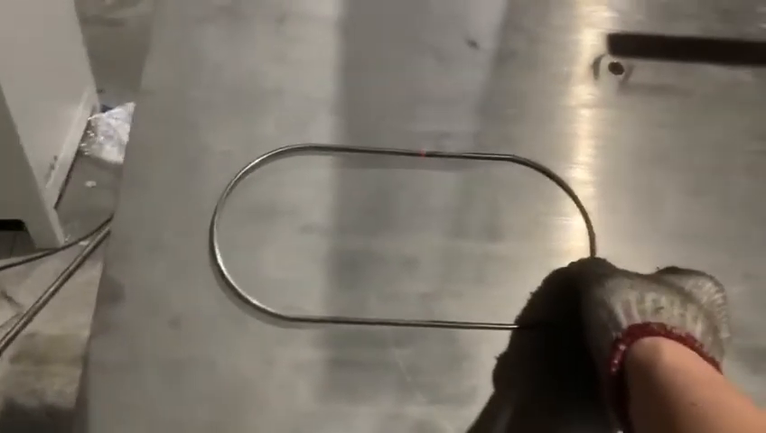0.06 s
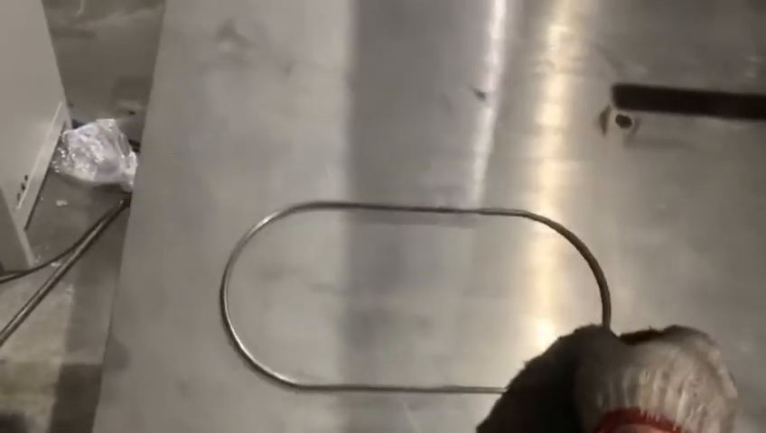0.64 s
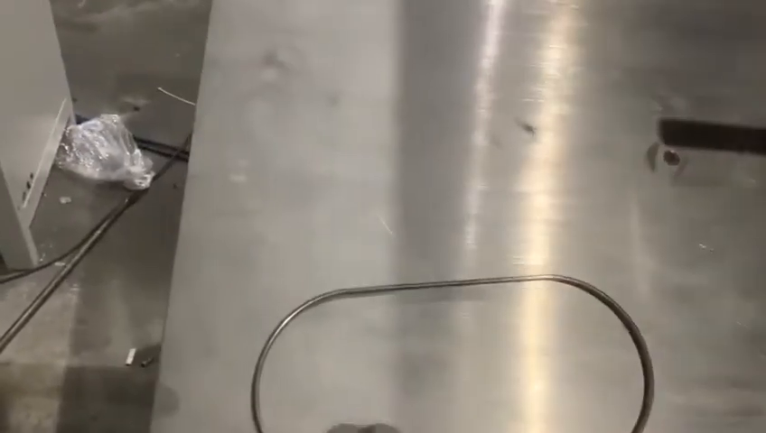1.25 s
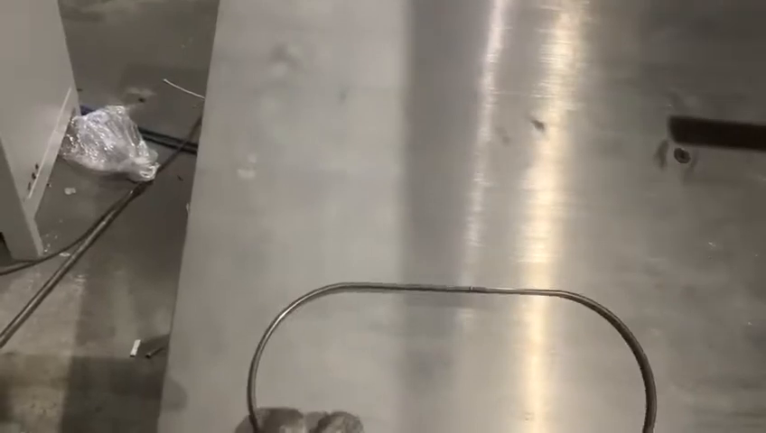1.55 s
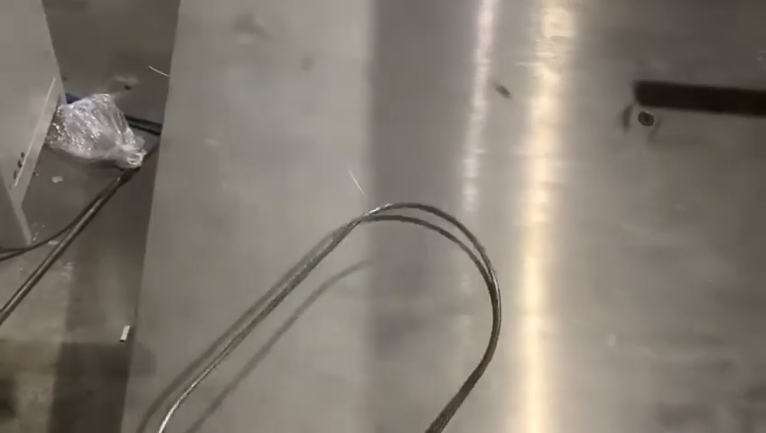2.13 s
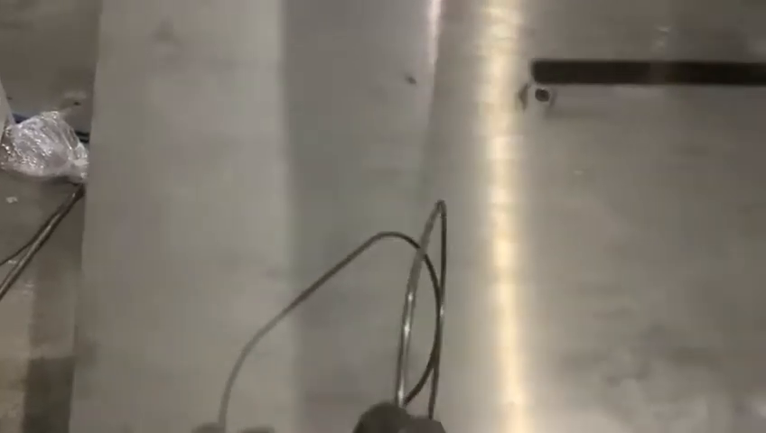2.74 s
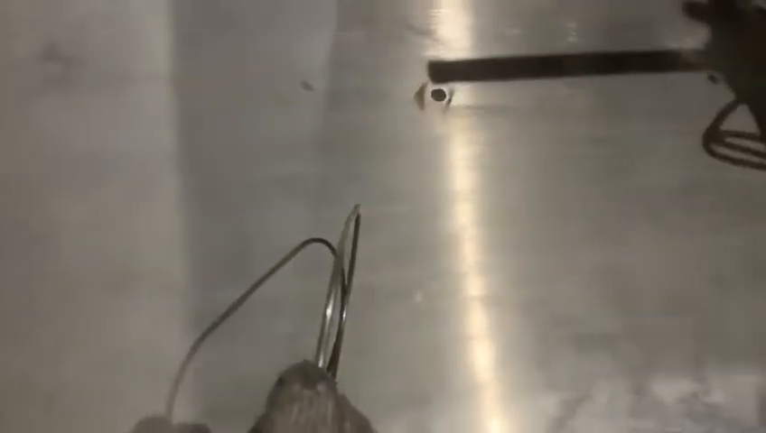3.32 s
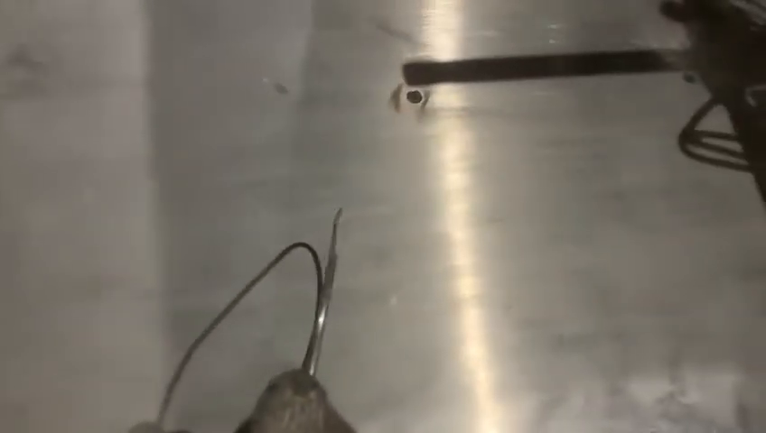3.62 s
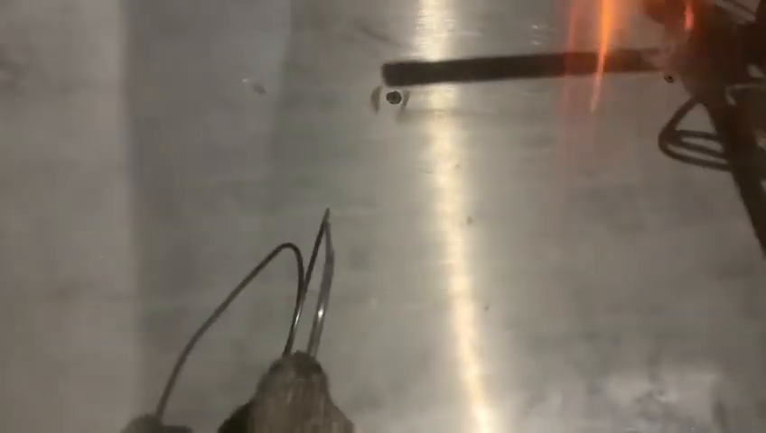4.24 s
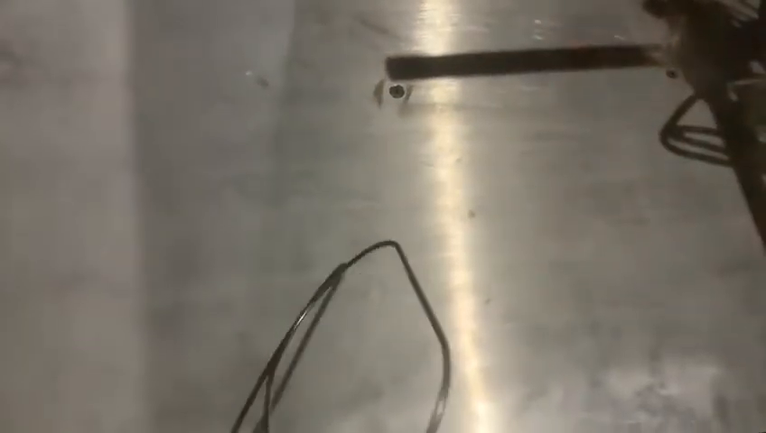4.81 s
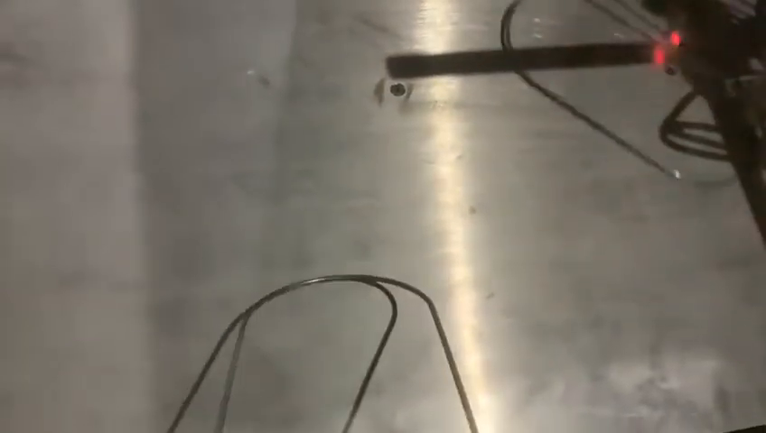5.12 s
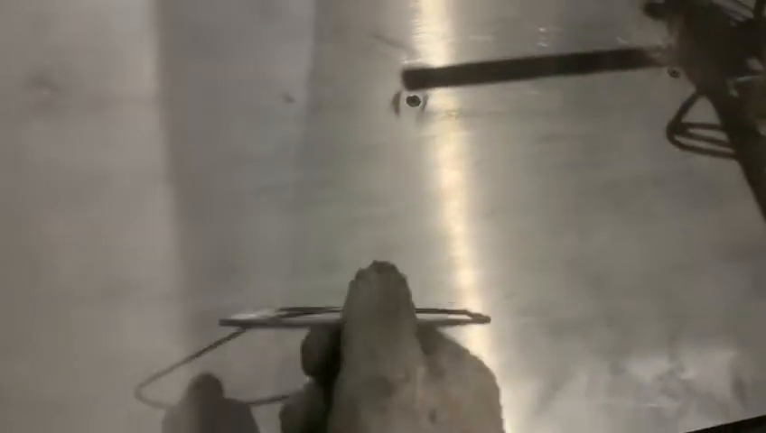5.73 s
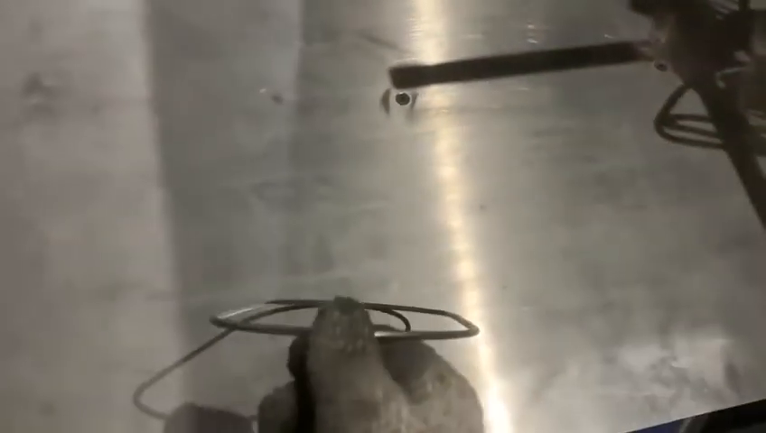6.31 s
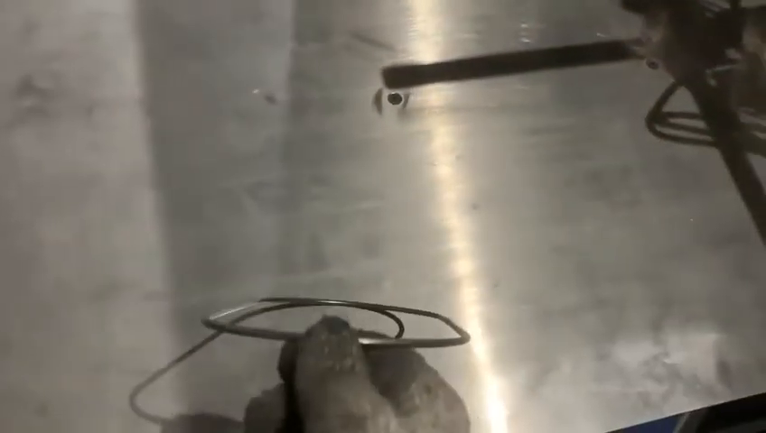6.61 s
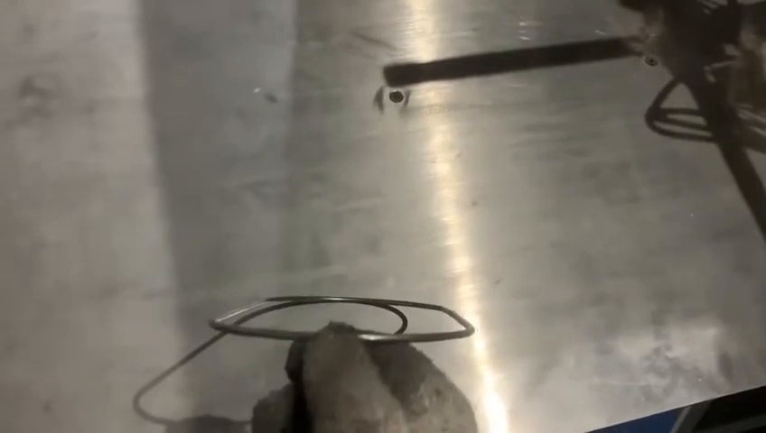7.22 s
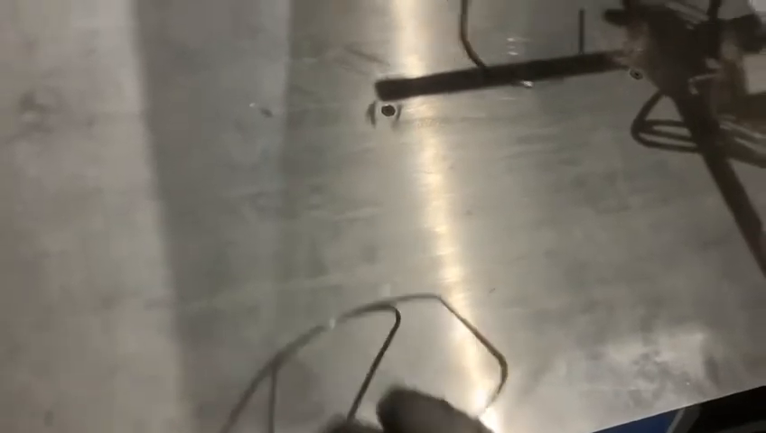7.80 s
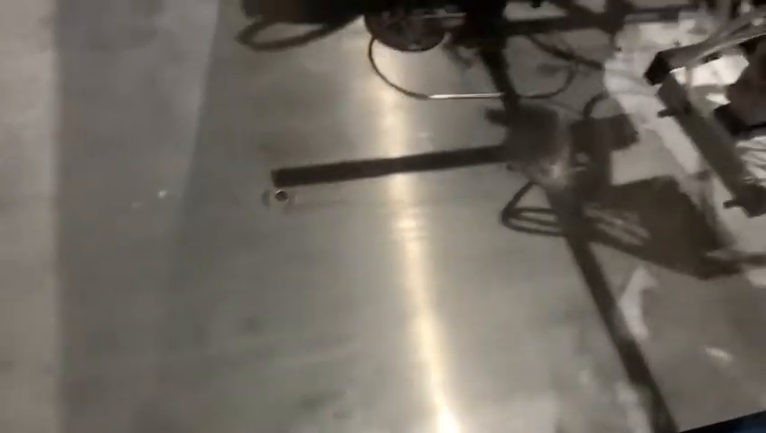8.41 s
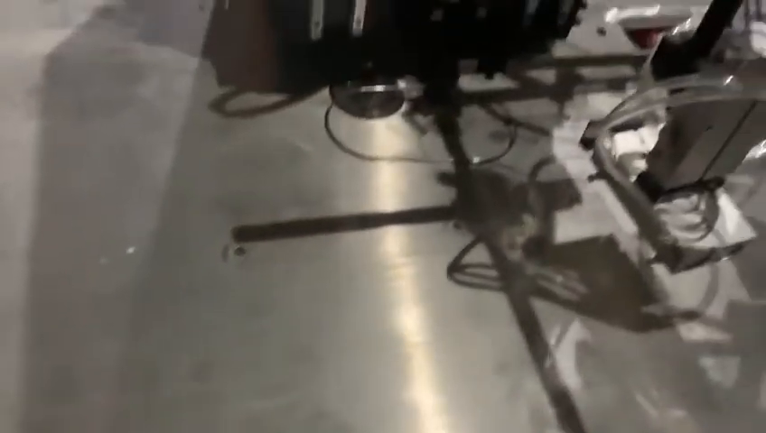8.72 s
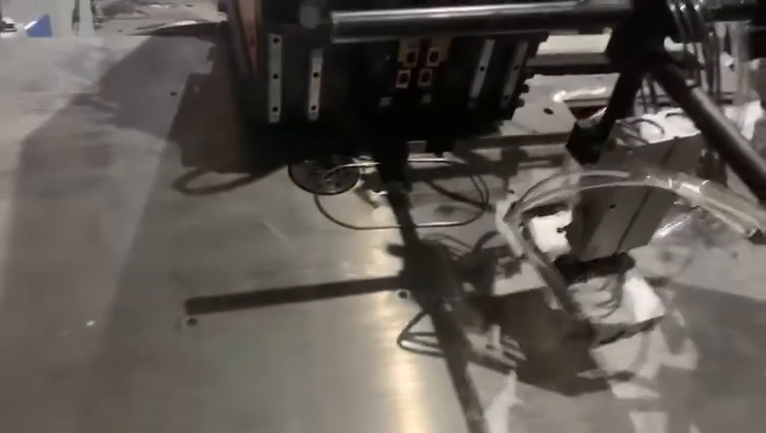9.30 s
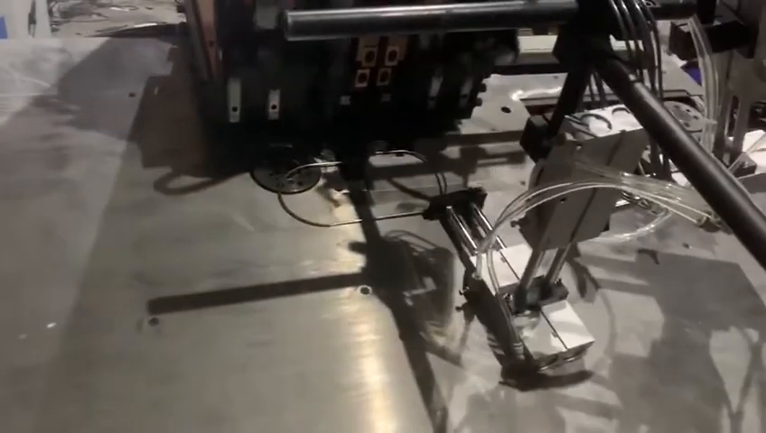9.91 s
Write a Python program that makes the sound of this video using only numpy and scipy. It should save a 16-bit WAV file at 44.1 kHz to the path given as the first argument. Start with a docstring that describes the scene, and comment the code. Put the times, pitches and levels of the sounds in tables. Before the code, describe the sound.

A puff of air and a hollow knock start the cycle of a wire bending and welding machine, heard close by. Cylinders hiss and squeak while slides rumble and clack against their stops over a low drone. Midway the welder hums briefly, then steel hoops clatter loudly and ring. After a quieter stretch, more clinks, clacks and hissing follow. Fans run steadily in the echoing factory hall.

```python
"""A puff of air and a hollow knock open the cycle of a wire bending and welding machine, heard close by.
Cylinders vent and hiss, slides rumble and clack against their stops, and the welder hums once.
Bent steel hoops clink on the tooling and bounce on a sheet steel table; each blow rings their modes.
Underneath, the frame drones, a servo whines and fans run in the echoing factory hall."""
import sys
import numpy as np
from scipy import signal
from scipy.fft import rfft, irfft, next_fast_len
from scipy.io import wavfile
from scipy.ndimage import uniform_filter1d

SR = 44100
rng = np.random.default_rng(int(sys.argv[2]) if len(sys.argv) > 2 else 0)


def generate_wav(sig):
    """Save sig (samples, or channels by samples) to the path in sys.argv[1] as 16-bit PCM at SR."""
    pcm = np.round(np.clip(np.atleast_2d(sig).T, -1, 1) * 32767).astype(np.int16)
    wavfile.write(sys.argv[1], SR, pcm)


N = 438794
TIME_S = np.arange(N) / SR

# Hoop on grippers or table, taps on a small guide, free wire struck at the bending head.
# Each row: start in seconds, relative level in dB, clash t60 in seconds, free ring in dB.
HOOP_BLOWS = [(0.2659, -27, 0.16, -4), (0.2937, -29.5, 0.1, -11), (0.3292, -28, 0.095, -4),
              (0.3502, -28.5, 0.12, -12), (1.809, -19.5, 0.1, -15), (2.5391, -30, 0.063, -12),
              (2.6472, -27.5, 0.059, 5), (4.5352, -25.5, 0.06, -8), (4.6759, -8, 0.084, -14),
              (4.8025, -30, 0.075, 2), (4.8585, -28.5, 0.09, 1), (4.9398, -10, .09, -12.5),
              (5.0085, -11, 0.06, -15.5), (5.0674, -20.5, 0.18, -7), (5.1113, -16.5, 0.17, -13),
              (5.1826, -28, 0.21, -6), (5.224, -18, 0.19, -7), (5.2737, -27.5, 0.14, -20),
              (5.3294, -30, 0.11, -15), (5.5308, -38.5, 0.11, -28), (6.2645, -30.5, 0.072, 7),
              (6.303, -35, 0.19, 3), (6.4128, -36, 0.091, 7), (8.2234, -24, 0.044, -17),
              (8.489, -20, 0.14, -15), (8.7246, -19, 0.084, 5), (8.7575, -19.5, .09, 4.5),
              (8.8952, -22.5, 0.087, -2)]
GUIDE_BLOWS = [(9.1306, -21, 0.087, 1), (9.1446, -21.5, 0.092, 1), (9.2938, -25, 0.023, 0),
               (9.3114, -34, 0.046, 1)]
WIRE_BLOWS = [(9.4796, -19.5, .08, -0.5), (9.7019, -22, 0.51, -1.5), (9.819, -27.5, 0.18, -2)]
# Modes of the steel parts. Each row: frequency in Hz, relative level in dB, t60 in seconds.
HOOP_MODES = [(2650, -24, 1), (6200, -3.5, 0.26), (7300, -6, 0.32), (7800, -10.5, 0.59), (9300, 6.5, 0.14),
              (9350, -12, 0.2), (10620, -1.5, 0.69), (10500, 2, 0.43), (11369, -23, .2), (11940, -6, 0.39),
              (12080, 4.5, 0.31), (12600, -13.5, .3), (13230, -19, .3), (13300, 9, 0.41), (14300, 14, 0.66)]
GUIDE_MODES = [(5900, -19, 0.97), (6550, -20, .6), (8260, -12, 0.98), (9237, -7, 0.51), (9800, -12, .3),
               (10400, -7.5, 0.86), (10860, -5, 0.65), (11600, -3, 0.65), (13113, 0, 0.6), (13500, -8, .35),
               (13800, 5, 0.46), (14200, -8, 0.41)]
WIRE_MODES = [(4650, -20, .3), (5050, -8, 0.27), (5470, -11, 0.37), (5600, -10, 0.33), (6200, -4, 0.53),
              (6370, -5, 0.57), (6670, -5, 0.39), (7320, -2, 0.48), (8000, -4, .3), (7840, -10, 1),
              (8204, -6, 0.56), (8800, -2, 0.39), (9100, -13, 0.56), (9850, -4, 0.33), (10400, -1.5, 0.55),
              (11050, -7, .4), (12100, -9, 0.41), (12300, -1.5, 0.37), (13350, -1, .4), (13990, 0.5, 0.3)]
FRAME_MODES = [(131.5, -11.5, 0.94), (163.1, 1, 0.45), (214, -11.5, 0.56), (312.7, -3.5, 0.76),
               (356, 1, 0.3)]
# Clamps, cutter and end stops. Each row: start in seconds, relative level in dB,
# hardness (treble boost) in dB, heft (bass boost) in dB, base t60 in seconds.
CLACK_BLOWS = [(0.175, -34, -6, -5, 0.11), (1.04, -21, 8, -7, .12), (1.557, -24, 0, -2, 0.23),
               (1.57, -24, 6.5, -0.5, 0.12), (1.6, -22, 4.5, -9, .13), (2.026, -21, 5.5, -11, 0.075),
               (2.647, -25, 0.5, -14, 0.22), (2.694, -28.5, 2.5, -17, 0.087), (2.889, -23, 10, -6, 0.11),
               (2.926, -23.5, -5, 0.5, 0.11), (3.438, -29, 9, 1, 0.066), (3.522, -32.5, -9, -2, 0.13),
               (3.819, -38.5, -28, 0.5, 0.17), (4.008, -33.5, -20, -2.5, 0.085),
               (4.674, -38, 20, -7, 0.077), (4.698, -31.5, 13, -8, 0.2), (4.833, -35.5, -1, 6, 0.13),
               (5.807, -33, -0.5, -11, 0.12), (5.834, -37, -6, -15, 0.15), (6.558, -44.5, -1, -8, 0.1),
               (7.57, -39.5, -3, -23, 0.38), (7.599, -38.5, -6, -6.5, 0.1), (8.12, -42, 11, -8, .21),
               (8.469, -44, 15.5, -12, .17), (8.488, -38, 22.5, -14, 0.31), (8.836, -40.5, 20, -7, 0.23),
               (9.595, -19, 4.5, -14, 0.087)]
# Centres in Hz of a clack's thud, body, clatter and crack.
BAND_CENTRES_HZ = [130, 600, 2800, 8000]
# Housing knocks. Each row: start in seconds, relative level in dB, base t60 in seconds.
HOUSING_BLOWS = [(0.0, -31.5, 0.28), (0.18, -28.5, 0.15), (1.56, -36, 0.35), (4.584, -29, 0.32),
                 (4.677, -22.5, 0.2), (5.281, -32, 0.62), (8.113, -33, 0.12), (8.477, -26.5, 0.21),
                 (9.6, -38, 0.24)]
# Housing modes. Each row: frequency in Hz, relative level in dB, share of the knock's t60.
HOUSING_MODES = [(365.8, -1.5, 0.72), (393.7, -5.5, 1), (522, -9, 1), (669, -1, 0.22)]
# Slide moves. Each row: start, run-up and braking in seconds, relative level at top speed in dB.
SLIDE_MOVES = [(0.185, 0.017, 0.26, -27), (0.43, 0.022, 0.092, -31.5), (1.62, 0.032, 0.24, -29),
               (1.8, .02, 0.19, -32), (2.55, 0.089, 0.23, -26.5), (2.94, 0.017, 0.3, -27.5),
               (3.2, 0.099, 0.13, -25.5), (3.44, 0.026, 0.16, -33), (4.44, 0.022, 0.21, -31),
               (4.59, 0.09, 0.075, -29.5), (4.851, 0.064, 0.37, -21.5), (5.24, 0.048, 0.31, -34.5),
               (6.842, 0.098, 0.16, -24.5), (8.748, 0.0061, 0.29, -29)]
# Cylinder exhausts. Each row: start and length in seconds, relative level in dB.
EXHAUSTS = [(0.0, 0.044, -26.5), (0.049, 0.53, -39), (0.585, 0.61, -35), (1.173, 0.98, -40),
            (2.2, 0.44, -34), (2.59, 0.346, -39), (2.937, .12, -29), (3.208, 0.087, -25.5),
            (3.3, 0.18, -39), (3.509, 0.045, -33), (4.271, 0.039, -31), (4.414, 0.12, -26),
            (4.536, .12, -45), (5.297, 0.3, -34), (6.722, 0.05, -38.5), (6.833, 0.16, -46),
            (7, 0.084, -36.5), (8.526, 0.22, -40), (8.823, .19, -35), (9.141, 0.54, -35),
            (9.617, 0.31, -37.5)]
# Exhaust port resonances. Each row: frequency and width in Hz, relative level in dB.
PORT_MODES = [(2370, 49, -26.5), (2877, 780, -16.5), (3443, 310, -16.5), (3860, 330, -19.5),
              (5400, 580, -19.5), (6660, 73, -20.5)]
# Valve squeals. Each row: start and length in seconds, first and last pitch in Hz, level in dB.
VALVE_SQUEALS = [(2.182, 0.12, 6020, 4160, -50), (2.593, 0.03, 5300, 4790, -31),
                 (3.21, 0.057, 5160, 4490, -34.5), (3.254, 0.058, 4420, 3580, -33),
                 (4.418, 0.062, 5160, 3800, -30.5), (4.421, 0.04, 3700, 3010, -35),
                 (4.51, 0.028, 6670, 6100, -34.5), (4.61, 0.048, 2550, 1990, -44),
                 (6.74, 0.038, 4700, 4600, -52)]
# Wire feed hiss, weld current, drive drone, frame boom after heavy strokes, servo turns.
# Each row: start and length in seconds, relative level in dB, fade in dB per second (negative swells).
FEED_RUNS = [(7.804, .45, -50, -28.5)]
WELD_RUNS = [(4.0, .55, -31.5, 23)]
DRONE_RUNS = [(1.6, .36, -43, 5), (2.2, 0.23, -38, 15), (2.87, 0.81, -27, 16), (3.7, 0.29, -44, -2),
              (4.04, 1.68, -32.5, 5.5)]
BOOM_RUNS = [(1.62, 0.34, -34, 0), (2.2, 0.158, -41, 27)]
SERVO_RUNS = [(2.2, 0.42, -60, 7), (5.55, 0.35, -63.5, 4), (6.75, 0.2, -46, 0), (7.35, 0.43, -52.5, 9),
              (9.15, 0.15, -58.5, 3)]
# Fan tones. Each row: frequency and width in Hz, level in dB.
FAN_TONES = [(525, 20, -61.5), (364, 21, -63), (64.7, 7.8, -66)]
# Noise spectra of the sources. Each row: frequency in Hz, relative density in dB.
CLASH_SPECTRUM = [(150, -25), (800, -6.5), (2000, -15), (4000, -6), (6000, -3), (8000, -4), (11000, -3),
                  (14000, -7)]
CLACK_SPECTRUM = [(29, -45), (50, -24), (141, -0.5), (254, -8), (380, 1.5), (528, -9.5), (718, -6),
                  (1120, -5), (1890, -22), (3250, -23.5), (3920, -13), (4960, -14), (8140, -11),
                  (9380, -14), (14000, -12.5)]
SLIDE_SPECTRUM = [(35, -33), (60, -9), (136, -3), (239, -6.5), (364, 1), (565, 1.5), (1280, -10),
                  (1420, -11.5), (1580, -12), (2120, -22.5), (2350, -18.5), (2560, -21.5), (3430, -21),
                  (7610, -26), (9000, -17), (11700, -49), (19800, -120)]
AIR_SPECTRUM = [(530, -53), (900, -2), (1190, -6.5), (1310, -6), (1560, -7), (2810, -10.5), (3960, -4),
                (7440, -5.5), (9470, -2.5), (11900, -3.5), (14000, -1)]
HALL_SPECTRUM = [(15, -57.5), (25, -13), (60, -11.5), (87, -19), (119, -6.5), (198, -17.5), (251, -10),
                 (364, -9.5), (571, -8), (724, -13.5), (784, -14), (1560, -32), (5880, -27.5),
                 (6710, -24.5), (14100, -14)]
# Echo decay. Each row: frequency in Hz, t60 in seconds.
ECHO_T60_S = [(100, 1.5), (500, 0.94), (2000, 0.78), (6000, .5), (14000, 0.25)]
# Echo strength. Each row: frequency in Hz, gain in dB.
ECHO_GAIN_DB = [(100, 0.5), (500, -2), (2000, -5.5), (6000, -9), (14000, -18.5)]


def clinks(blows, modes, clash_db, chatter_db, ring_db, snap_db, rise_s):
    """Steel on steel: a noisy clash, the part's modes blurred by chatter, then its free ring."""
    out, t = np.zeros(N), TIME_S[:SR // 2]
    for start_s, db, t60_s, free_db in blows:
        clash = shaped_noise(len(t), CLASH_SPECTRUM, uneven_db=7, ripple_hz=99.9)
        chatter = ring(modes, t, split_hz=164, vary_db=4)
        free = gain_of(ring_db + free_db) * ring(modes, t, split_hz=55.3, vary_db=4)
        # a damped part clashes more and chatters less
        contact = gain_of(clash_db - 0.42 * free_db) * clash
        contact += gain_of(chatter_db + 0.72 * free_db) * chatter
        clink = contact * struck(t, rise_s, t60_s) + free * struck(t, rise_s, 3.6)
        snap = gain_of(snap_db) * chatter * struck(t, 0.00033, 0.079)
        add(out, start_s, gain_of(db) * (clink + snap))
    return out


def clacks():
    """Blows shake the machine's crowded modes: quick treble, bass that swells and lingers."""
    out, t = np.zeros(N), TIME_S[:2 ** 15]
    for start_s, db, hardness_db, heft_db, t60_s in CLACK_BLOWS:
        shake = shaped_noise(len(t), CLACK_SPECTRUM, uneven_db=1, ripple_hz=59.56)
        thud, body, clatter, crack = split_bands(shake)
        thud *= gain_of(heft_db - 1.4) * struck(t, 0.021, 2.14 * t60_s)
        body *= gain_of(0.29) * struck(t, 0.0052, 1.64 * t60_s)
        clatter *= gain_of(0.53 * hardness_db - 5) * struck(t, 0.0022, 1.46 * t60_s)
        crack *= gain_of(hardness_db + 0.39) * struck(t, 0.0013, 0.83 * t60_s)
        frame = ring(FRAME_MODES, t, split_hz=4.4, vary_db=2.5)
        frame *= gain_of(heft_db - 5.5) * struck(t, 0.0024, 6.6)
        add(out, start_s, gain_of(db) * (thud + body + clatter + crack + frame))
        add(out, start_s, gain_of(db + hardness_db - 1) * contact_snap())
    return out


def contact_snap():
    """The first instant of a hard contact."""
    t = TIME_S[:SR // 16]
    burst = shaped_noise(len(t), CLACK_SPECTRUM, uneven_db=2.5, ripple_hz=212)
    return burst * struck(t, rise_s=0.00059, t60_s=0.022)


def knocks():
    """The sheet housing booms briefly when a heavy part stops."""
    out, t = np.zeros(N), TIME_S[:SR // 2]
    for start_s, db, t60_s in HOUSING_BLOWS:
        modes = [(hz, mode_db, share * t60_s) for hz, mode_db, share in HOUSING_MODES]
        housing = ring(modes, t, split_hz=6.2, vary_db=-0.5)
        add(out, start_s, gain_of(db - 4) * housing * struck(t, 0.0017, 3.9))
    return out


def slides(breakaway_share=0.37):
    """Carriages jump to a share of top speed, run up and brake, rumbling unevenly on their rails."""
    level = np.zeros(N)
    for start_s, run_up_s, braking_s, db in SLIDE_MOVES:
        corners_s = [0, run_up_s, run_up_s + braking_s]
        speed = np.interp(TIME_S - start_s, corners_s, [breakaway_share, 1, 0], left=0, right=0)
        level += gain_of(db) * speed
    judder = gain_of(1.6 * noisy_tone(24, width_hz=34))
    return gain_of(-6.5) * uniform_filter1d(level, 400) * judder * shaped_noise(N, SLIDE_SPECTRUM)


def valve_squeals():
    """Valves squeal briefly, falling in pitch."""
    out = np.zeros(N)
    for start_s, length_s, first_hz, last_hz, db in VALVE_SQUEALS:
        size = int(length_s * SR)
        squeal = noisy_tone(np.geomspace(first_hz, last_hz, size), width_hz=300, size=size)
        add(out, start_s, gain_of(db) * squeal * signal.windows.tukey(size, 0.5))
    return out


def air_hiss(sag_db=4):
    """The hiss starts at once and sinks as a cylinder empties; it swells once as wire is fed."""
    runs = [(start_s, length_s, db, sag_db / length_s) for start_s, length_s, db in EXHAUSTS]
    level = held(runs + FEED_RUNS, attack_s=0.00079, release_s=0.0092)
    jet = shaped_noise(N, AIR_SPECTRUM, uneven_db=1.5, ripple_hz=82.4)
    ports = sum(gain_of(db) * noisy_tone(hz, width_hz) for hz, width_hz, db in PORT_MODES)
    flutter = gain_of(0.78 * noisy_tone(25, width_hz=64))
    return gain_of(-1) * level * flutter * (jet + ports)


def welder(hum_hz=101, overtone_db=-19):
    """The transformer hums at twice the mains rate while current flows."""
    phase = 2 * np.pi * hum_hz * TIME_S
    hum = np.sin(phase) + gain_of(overtone_db) * (np.sin(3 * phase) + np.sin(6 * phase))
    return held(WELD_RUNS, attack_s=0.049, release_s=0.04) * hum


def frame_drone(boom_hz=132, swell_s=0.03, release_s=0.039):
    """The drives keep the frame's low modes sounding; one booms on after a stroke."""
    tones = noisy_tone(131, width_hz=5.6)
    tones += gain_of(2) * noisy_tone(116, width_hz=16)
    tones += gain_of(-3.5) * noisy_tone(160, width_hz=75)
    boom = held(BOOM_RUNS, swell_s, release_s) * np.sin(2 * np.pi * boom_hz * TIME_S)
    return gain_of(-8.5) * held(DRONE_RUNS, swell_s, release_s) * unit_rms(tones) + boom


def servo(whine_hz=573, hold_db=-60.5):
    """One wavering motor tone: quiet while holding, louder while turning."""
    level = gain_of(hold_db) + held(SERVO_RUNS, attack_s=0.049, release_s=0.25)
    return level * noisy_tone(whine_hz, width_hz=7)


def hall_echo(x, build_s=0.0013):
    """A dense echo that builds up and dies soonest in the treble."""
    hz, t, noise = signal.stft(rng.standard_normal(SR), SR, nperseg=256)
    shape = struck(t, build_s, value_at(ECHO_T60_S, hz)[:, None])
    shape /= np.sqrt(SR * np.mean(shape ** 2, axis=1, keepdims=True))
    shape *= gain_of(value_at(ECHO_GAIN_DB, hz))[:, None]
    _, response = signal.istft(noise * shape, SR, nperseg=256)
    return signal.fftconvolve(x, response)[:N]


def hall_background(noise_db=-40.74):
    """Steady hall noise with wavering fan tones."""
    fans = sum(gain_of(db) * noisy_tone(hz, width_hz) for hz, width_hz, db in FAN_TONES)
    return gain_of(noise_db) * shaped_noise(N, HALL_SPECTRUM) + fans


def ring(modes, t, split_hz, vary_db, count=6):
    """Each mode is a beating cluster; each blow lands elsewhere and weights the modes anew."""
    hz, db, t60_s = np.transpose(modes)[:, :, None]
    weight, *offsets = rng.uniform(-1.06, 1, (count + 1, len(modes), 1))
    cycles = ((hz + split_hz * offset) * t + rng.random(hz.shape) for offset in offsets)
    clusters = sum(np.sin(2 * np.pi * turns) for turns in cycles)
    sound = (gain_of(db + vary_db * weight - 60 * t / t60_s) * clusters).sum(axis=0)
    return sound / np.std(sound[:SR // 25])


def shaped_noise(size, spectrum, uneven_db=0, ripple_hz=90):
    """Noise with a given spectrum, at rms 1; random ripple stands for crowded modes."""
    noise, fft_size = rng.standard_normal(size), next_fast_len(size)
    hz = np.fft.rfftfreq(fft_size, 1 / SR)
    ripple = np.interp(hz / ripple_hz, np.arange(1000), rng.standard_normal(1000))
    gain = gain_of(value_at(spectrum, hz) + uneven_db * ripple)
    return unit_rms(irfft(rfft(noise, fft_size) * gain, fft_size)[:size])


def noisy_tone(hz, width_hz, size=N):
    """Noise in one resonance, at rms 1; hz may glide."""
    pole = np.exp(-np.pi * width_hz / SR)
    noise = rng.standard_normal(size + SR // 4) + 1j * rng.standard_normal(size + SR // 4)
    waver = signal.lfilter([1], [1, -2 * pole, pole * pole], noise)[-size:]
    carrier = np.exp(2j * np.pi * np.cumsum(hz * np.ones(size)) / SR)
    return unit_rms((waver * carrier).real)


def split_bands(x):
    """Four overlapping bands, low to high, each at rms 1."""
    hz = np.fft.rfftfreq(len(x), 1 / SR)
    spectrum = rfft(x) * np.minimum(hz / 100, 1)  # the machine radiates little deep bass
    masks = [value_at(list(zip(BAND_CENTRES_HZ, row)), hz) ** 2 for row in np.eye(4)]
    return [unit_rms(irfft(spectrum * mask, len(x))) for mask in masks]


def struck(t, rise_s, t60_s):
    """Envelope of a blow: it spreads through the part, then dies away."""
    return (1 - np.exp(-t / rise_s)) * gain_of(-60 * t / t60_s)


def held(runs, attack_s, release_s):
    """Envelope of runs: switch on, fade or swell steadily, switch off."""
    level = np.zeros(N)
    for start_s, length_s, db, fade_db_per_s in runs:
        t = TIME_S[:int((length_s + 8 * release_s) * SR)]
        attack = 1 - np.exp(-t / attack_s)
        release = np.exp(-np.maximum(t - length_s, 0) / release_s)
        add(level, start_s, gain_of(db - fade_db_per_s * t) * attack * release)
    return level


def value_at(curve, hz):
    """Interpolates on a log-frequency axis."""
    points_hz, values = np.transpose(curve)
    return np.interp(np.log(hz + 1), np.log(points_hz + 1), values)


def add(mix, start_s, sound):
    part = mix[round(start_s * SR):][:len(sound)]
    part += sound[:len(part)]


def gain_of(db):
    return 10 ** (np.asarray(db) / 20)


def unit_rms(x):
    return x / np.sqrt(np.mean(x ** 2) + 1e-20)


def scene():
    """The machine and its wire in the hall, in mono; the wire is nearer and drier."""
    steel = clinks(HOOP_BLOWS, HOOP_MODES,
                   clash_db=-3, chatter_db=-5, ring_db=-9, snap_db=-5.5, rise_s=0.0022)
    steel += clinks(GUIDE_BLOWS, GUIDE_MODES,
                    clash_db=-9, chatter_db=-13, ring_db=-4.5, snap_db=-1, rise_s=0.0046)
    steel += clinks(WIRE_BLOWS, WIRE_MODES,
                    clash_db=-9, chatter_db=-12, ring_db=-2.5, snap_db=-4.5, rise_s=0.0059)
    machine = clacks() + knocks() + slides() + valve_squeals() + air_hiss()
    echo = hall_echo(machine + gain_of(-1.5) * steel)
    return (steel + machine + echo + welder() + frame_drone() + servo() + hall_background())[None]


def record(dry):
    """Rounds off the loudest peaks, then cuts the top treble."""
    ceiling, cutoff_hz = 0.75, 14200
    rounded = dry / (1 + (dry / ceiling) ** 6) ** (1 / 6)
    lowpass = signal.firwin(601, cutoff_hz, window=("kaiser", 8), fs=SR)
    return signal.oaconvolve(rounded, lowpass[None], "same")


dry = scene()
out = record(dry)
generate_wav(out)
```